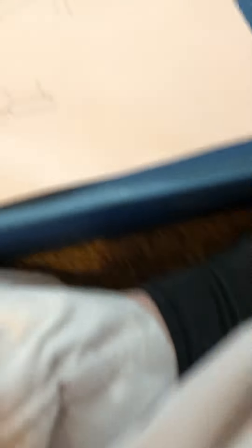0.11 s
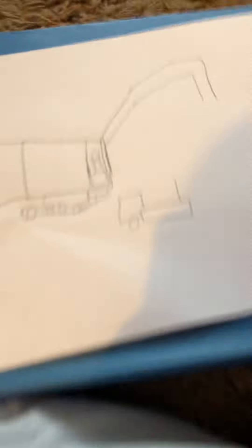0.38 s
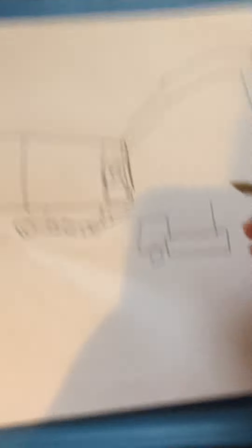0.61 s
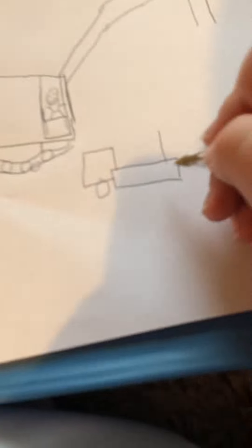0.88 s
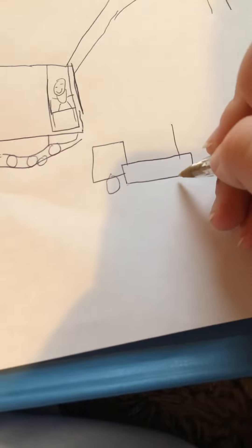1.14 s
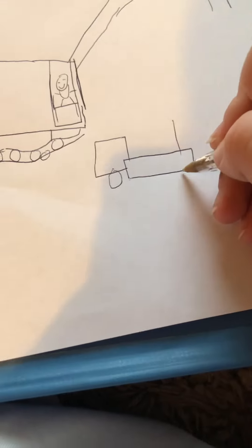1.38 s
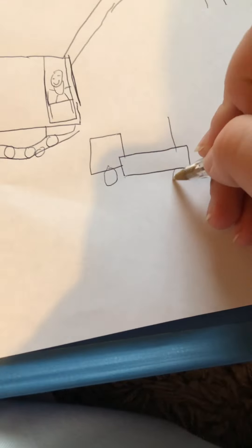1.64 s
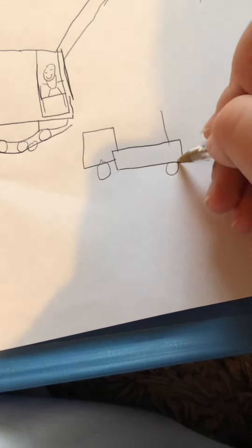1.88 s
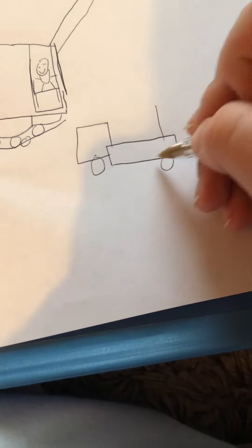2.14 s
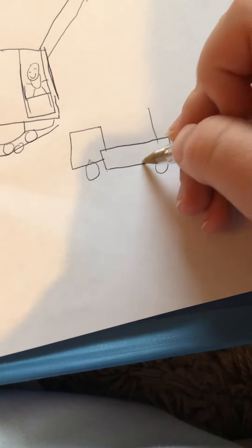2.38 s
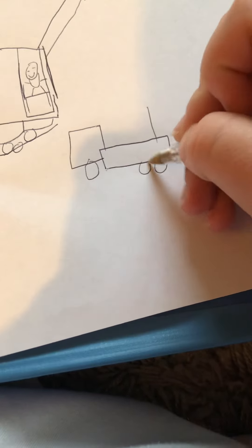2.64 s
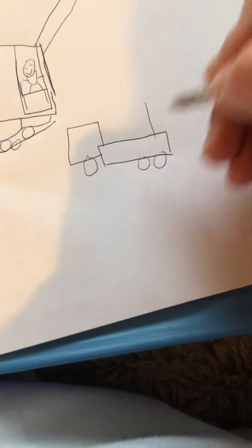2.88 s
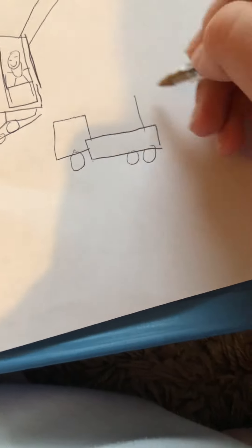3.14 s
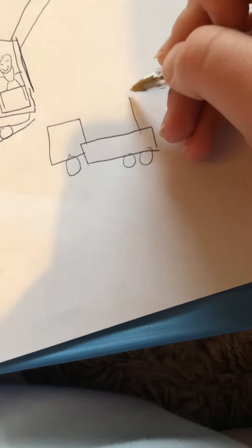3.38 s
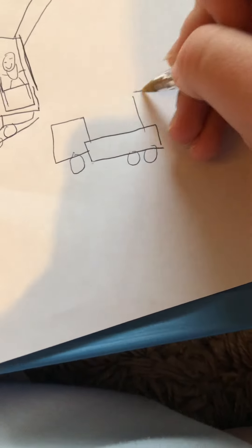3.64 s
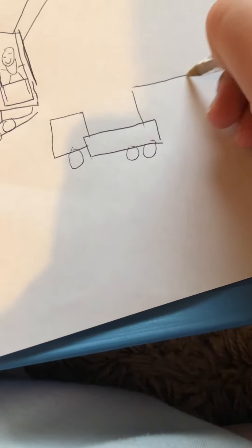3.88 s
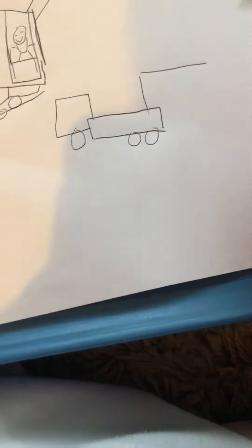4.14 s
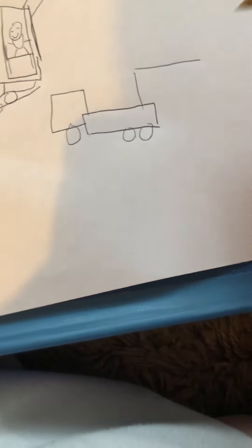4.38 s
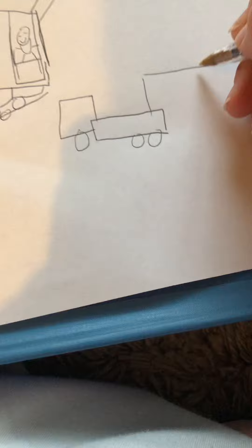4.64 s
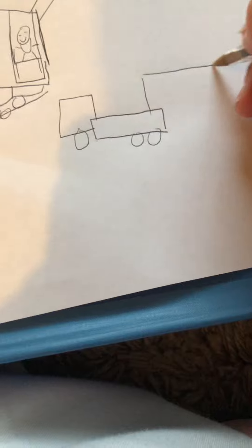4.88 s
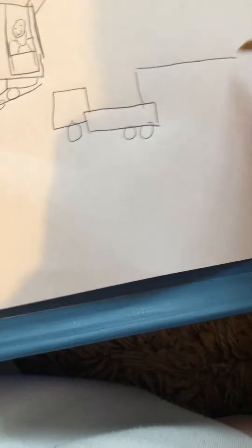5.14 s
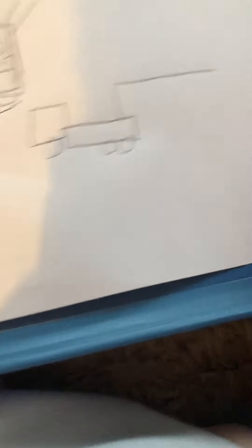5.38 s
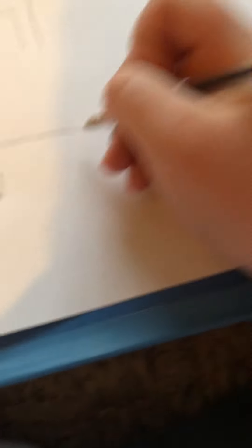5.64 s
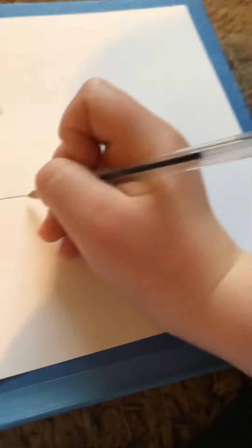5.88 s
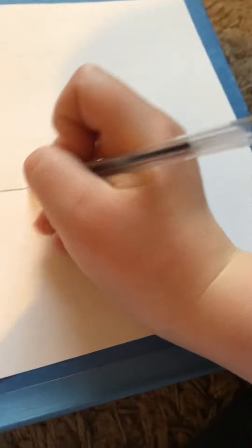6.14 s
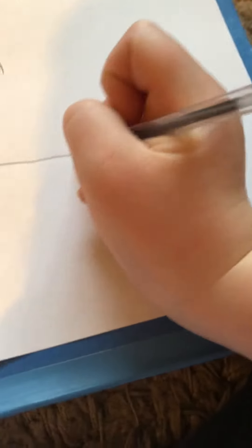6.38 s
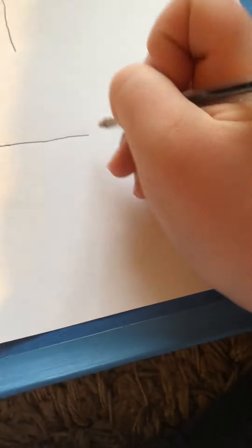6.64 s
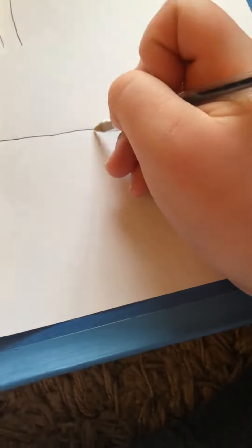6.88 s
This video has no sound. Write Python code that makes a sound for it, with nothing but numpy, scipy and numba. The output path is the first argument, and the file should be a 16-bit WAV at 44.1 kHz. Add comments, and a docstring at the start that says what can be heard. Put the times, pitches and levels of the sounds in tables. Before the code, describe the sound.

Very close to the microphone in a quiet carpeted room, cloth and paper rustle briefly, then a ballpoint pen draws short lines on a sheet resting on something hollow. Each landing gives a small woody tap, followed by a low drumming scrape with fine hiss. The hand brushes across the paper between strokes; another rustle comes before the last stroke.

```python
"""Ballpoint pen on a card box

A ballpoint pen draws short lines on a sheet lying on a hollow card box, in a quiet carpeted room, close by.
Rolling tip and landings force the damped modes of the lid; the box rocks and the pressed sheet crunches.
Tip hiss, hand skids and rustles are trains of friction grains shaped by spectra and resonances;
dry ticks are ringing noise bursts, over a steady bed of coloured noise."""
import sys
import numpy as np
from scipy import signal
from scipy.fft import rfft, irfft, next_fast_len
from scipy.io import wavfile
from scipy.ndimage import uniform_filter1d
from numba import njit

SR = 44100
rng = np.random.default_rng(int(sys.argv[2]) if len(sys.argv) > 2 else 0)


def wrap_up_sound(samples):
    """Save the sound to the file named by the first command line argument, as 16-bit audio."""
    columns = np.atleast_2d(samples).T
    # keep every value between -1 and 1, then stretch to whole-number steps
    tamed = np.clip(columns, -1, 1)
    steps = np.round(tamed * 32767).astype(np.int16)
    wavfile.write(sys.argv[1], SR, steps)


def voltage_ratio(level):
    """Linear amplitude factor for a level in decibels (scalar or array-like)."""
    return 10 ** (np.asarray(level, float) / 20)


N = 309141  # length of the scene in samples


# modes of the box lid: mode_hz, level_db, t60_s
LID_MODES = [(122, -16, 0.02), (152, -6, 0.019), (202.3, -0.5, 0.13), (233, -1, 0.16), (271.2, 5, 0.059),
             (321.2, 3, 0.039), (366.4, -4.5, 0.031), (411, -22, 0.14), (600, -39, 0.093),
             (632, -6.5, 0.0079), (726, -23, 0.037), (1000, -17, 0.012), (1380, -51, 0.0092),
             (1860, -33, 0.0065)]


def lid(force):
    """Modal superposition: the lid sums its damped modes; a small panel radiates little low sound."""
    out = sum(voltage_ratio(db) * ring(force, hz, t60_s) for hz, db, t60_s in LID_MODES)
    return signal.sosfilt(signal.butter(4, 140, "high", fs=SR, output="sos"), out)


# pressure of the rolling tip in each stroke, as lid rumble: time_s, level_db
PRESSURE = [
    [(1.58, -58), (1.6, -59.5), (1.648, -46), (1.674, -51.5), (1.838, -54.5), (1.886, -49), (1.95, -71)],
    [(2.45, -46.5), (2.47, -57.5), (2.526, -50), (2.552, -54.5), (2.694, -47.5), (2.788, -62), (2.8, -50)],
    [(3.15, -47), (3.182, -47), (3.194, -56.5), (3.27, -65)],
    [(3.62, -54.5), (3.684, -43), (3.758, -43.5), (3.886, -45.5), (3.9, -41), (3.984, -48.5), (4.04, -64)],
    [(4.83, -59), (4.842, -56), (4.882, -42.5), (4.954, -41.5), (5.062, -51.5), (5.106, -61.5), (5.12, -67)],
    [(6.125, -56), (6.163, -40), (6.227, -34.5), (6.259, -42), (6.35, -58.5)],
]
# the hand shifting its weight on the lid: peak_s, rumble_db, rise_s, fall_s
NUDGES = [(.185, -60, .1, 0.054), (.4, -61.5, 0.11, 0.12), (.73, -61, .04, 0.19), (.89, -61.5, 0.032, 0.21),
          (1.05, -61.5, 0.045, 0.071), (1.96, -65, 0.022, 0.33), (2.08, -69, 0.026, 0.037),
          (2.89, -63.5, 0.035, 0.039), (4.58, -54.5, 0.02, 0.056), (4.655, -56.5, 0.046, 0.029),
          (5.4, -67.5, 0.19, 0.18), (5.6, -59.5, 0.16, 0.16), (6.375, -62.5, 0.024, 0.19),
          (6.71, -54, 0.083, 0.044), (6.82, -63.5, 0.049, 0.12)]
WEIGHT_SHAPE = (1.66, 1.55)  # swell exponents (rise, fall): 1 pointed, 2 round, more = firm edge


def lid_rumble():
    """Forced vibration: tip and hand drag over paper grain, whose dense bumps drum the lid."""
    bumps = grains(per_s=5600, spread_db=2.86)
    # paper cushions the ball
    cushioned = signal.sosfilt(signal.butter(2, 420, fs=SR, output="sos"), bumps) + 4.44 * bumps
    rumble = rms_one(lid(cushioned))
    # steady pressure evens the swells
    swell = np.sqrt(uniform_filter1d(rumble ** 2, size=1300) + 0.24)
    evened = rumble / swell ** 0.5
    fall_longer = 2.52  # the weight stays on the lid this many times longer than the hiss
    skidding = [(s, lid_db, rise_s, fall_s * fall_longer) for s, _, rise_s, fall_s, lid_db in SKIDS]
    weight = swells(NUDGES + skidding, WEIGHT_SHAPE)
    return evened * (gains(PRESSURE, column=1) + weight)


# pen tip and knuckles landing on the lid: landing_s, peak_db, contact_ms, after_shocks_db
TAPS = [(0.872, -55.5, 0.87, -23), (1.51, -39.5, 1.08, -25), (1.631, -34, 7.4, -38),
        (1.864, -39.5, 1.1, -24), (2.068, -54, 5.5, -19), (2.413, -35, 1.3, -27), (2.83, -45, 0.66, -43),
        (3.131, -27.5, 1.05, -25), (3.163, -34, 3, -33), (3.564, -27.5, 0.7, -28.5),
        (3.899, -46, 0.45, -41), (4.066, -36.5, 1.1, -9), (4.53, -37, 0.55, -18), (4.778, -26, 1.07, -31),
        (5.158, -35.5, 3.5, -16), (6.083, -32.5, 1.16, -28.5), (6.362, -44.5, 1.4, -34),
        (6.45, -44.5, 5.1, -26.5), (6.69, -45, 0.64, -27)]


def taps():
    """Impact excitation: a shorter contact reaches higher modes; small after-shocks follow the push."""
    out, t = np.zeros(N), np.arange(SR // 5) / SR
    noises = rng.standard_normal((len(TAPS), SR // 5))
    for (s, peak_db, contact_ms, shocks_db), noise in zip(TAPS, noises):
        width = max(int(contact_ms * SR / 1000), 4)
        blows = voltage_ratio(shocks_db) * noise * np.exp(-t / 0.012)
        blows[0] = 1
        push = np.convolve(blows, np.hanning(width + 2))[:len(t)]
        thud = spread(lid(push), travel_ms=5.5)
        at = round((s - 0.002) * SR)  # starts 2 ms ahead of landing_s
        out[at:at + len(thud)] += (voltage_ratio(peak_db) * thud / np.abs(thud).max())[:N - at]
    return out


def rocking():
    """Low-frequency body motion: the box lurches after landings, sways under weight and never rests."""
    deep = signal.sosfilt(signal.butter(2, (50, 137), "band", fs=SR, output="sos"), rng.standard_normal(N))
    usual_tap_db, follows_tap = -36, 0.53  # share of a tap's excess over the usual that the lurch follows
    lag_s, rise_s, fall_s, under_tap_db = 0.0089, 0.039, 0.16, -24
    lurch_rows = []
    for s, tap_db, *_ in TAPS:
        lurch_db = usual_tap_db + follows_tap * (tap_db - usual_tap_db) + under_tap_db
        lurch_rows.append((s + lag_s, lurch_db, rise_s, fall_s))
    lurches = swells(lurch_rows, WEIGHT_SHAPE)
    under_tip = voltage_ratio(-27) * gains(PRESSURE, column=1)
    under_hand = voltage_ratio(-21.5) * swells(NUDGES, WEIGHT_SHAPE)
    restless = voltage_ratio(-76 + 3 * drift(1.0))
    return rms_one(deep) * (lurches + under_tip + under_hand + restless)


def crunch():
    """Granular crushing: each landing flattens the sheet in a short gritty burst that decays away."""
    under_tap_db, decay_s = -32, 0.0093
    band = signal.butter(1, (684, 5000), "band", fs=SR, output="sos")
    grit = signal.sosfilt(band, grains(per_s=3000, spread_db=4.0))
    hits = np.zeros(N)
    for s, tap_db, *_ in TAPS:
        hits[round(s * SR)] = voltage_ratio(tap_db + under_tap_db)
    return rms_one(grit) * signal.lfilter([1], [1, -np.exp(-1 / (decay_s * SR))], hits)


# pen strokes (levels at usual pressure): start_s, end_s, hiss_db, ring_hz, ring_db (relative to hiss_db)
STROKES = [(1.607, 1.873, -71.5, 5100, -10), (2.437, 2.753, -73, 4930, -17),
           (3.135, 3.274, -65.5, 4400, -17.5), (3.608, 3.986, -70, 4130, -11.5),
           (4.827, 5.064, -70.5, 4570, -7), (6.135, 6.31, -70.5, 5000, -7)]
# ball scraping, heard through pen and sheet: frequency_hz, level_db (per Hz)
BARREL = [(710, -30), (1200, 1), (1520, 1), (1910, -3), (2890, -9), (4170, -4), (5840, -9.5), (8170, -12.5),
          (10300, -11), (15200, -10.5), (16000, -29)]
# tip overtones: multiple (of ring_hz), width_hz, level_db
TIP = [(1, 480, 0), (1.42, 700, -7), (2.35, 1100, -5)]


def tip_hiss():
    """Rolling friction: fine scraping drives the tip's resonances, which differ with each grip."""
    scrape, t = grains(per_s=17000, spread_db=0.5), np.arange(N) / SR
    start, end, hiss_db, ring_hz, ring_db = np.transpose(STROKES)
    rise_s, fall_s = 0.015, 0.015  # time per 10 dB outside the stroke
    now = np.clip(np.searchsorted(start - 3 * rise_s, t) - 1, 0, None)  # stroke in force
    outside = np.maximum(start[now] - t, 0) / rise_s + np.maximum(t - end[now], 0) / fall_s
    usual_pressure_db, hiss_follows, ring_follows = -46, 0.6, 0.1  # shares of the pressure's swing heard
    swing_db = track(PRESSURE, column=1) - usual_pressure_db
    centre_hz = ring_hz[now] * (1 + 0.02 * drift(3.3))
    tip = sum(voltage_ratio(db) * resonance(scrape, multiple * centre_hz, width_hz) for multiple, width_hz, db in TIP)
    hiss = voltage_ratio(hiss_follows * swing_db) * coloured(scrape, BARREL)
    ringing = voltage_ratio(ring_db[now] + ring_follows * swing_db) * tip
    flicker_db = 2 * drift(13.4)
    return (hiss + ringing) * voltage_ratio(flicker_db + hiss_db[now] - 10 * outside)


# dry ticks of ball and sheet: start_s, peak_db, centre_hz, cycles (within one 60 dB decay)
TICKS = [(0.154, -47, 9500, 3.0), (.325, -49, 9000, 2), (.722, -51, 9000, 2.2), (0.8918, -54, 6000, 2.2),
         (1.4925, -51.5, 6760, 1.7), (1.5073, -52.5, 7000, 1.7), (2.393, -55, 6000, 0.83),
         (2.807, -53, 6000, 3), (2.823, -59, 6900, 2.6), (1.864, -59, 1500, 3.0), (3.1285, -47, 3500, 0.53),
         (3.898, -63, 900, 3.6), (5.159, -56, 1180, 4.7), (3.545, -47, 8860, 5.9), (3.5628, -53, 3180, 6.6),
         (3.5712, -66, 5950, 1.9), (4.0666, -52, 5000, 2.5), (4.531, -48, 2200, 1.7),
         (4.7705, -50, 10000, 2.6), (4.7766, -63, 3120, 2), (4.786, -66, 7000, 1.9),
         (4.9598, -45.5, 2750, 5.0), (4.96, -43, 8000, 2.5), (6.075, -46, 12900, 2.4),
         (6.082, -57, 4500, 1.3), (6.0917, -47, 3600, 6.4), (6.447, -60, 4970, 5.1),
         (6.786, -61.5, 1480, 25)]


def ticks():
    """Transient resonance: a tiny noise burst rings a few cycles through two equal modes in a row."""
    out, t = np.zeros(N), np.arange(800) / SR
    for (s, peak_db, hz, cycles), noise in zip(TICKS, rng.standard_normal((len(TICKS), 800))):
        burst = noise * np.exp(-t / 0.0005)
        t60_s = cycles / hz
        ringing = ring(ring(burst, hz, t60_s), hz, t60_s)
        tick = np.diff(ringing, prepend=0)
        at = round(s * SR)
        out[at:at + 800] += voltage_ratio(peak_db) * tick / np.abs(tick).max()
    return out


# skin skidding on paper: peak_s, hiss_db, rise_s, fall_s, lid_rumble_db
SKIDS = [(2.185, -71.5, 0.14, 0.046, -69), (2.23, -52.5, 0.049, 0.037, -63.5),
         (2.51, -62, 0.045, 0.022, -69), (2.843, -52, 0.032, .045, -57.5), (3.298, -53, 0.034, 0.031, -64),
         (4.103, -45.5, 0.035, 0.064, -49), (5.196, -52, 0.043, 0.037, -53),
         (6.49, -51.5, 0.031, 0.03, -53), (6.691, -62, 0.011, 0.014, -65), (6.761, -58, 0.027, 0.02, -60.5)]
# spectrum of the skid: frequency_hz, level_db (per Hz)
SKID_COLOUR = [(530, -5), (900, -0.5), (1250, -5), (1370, -4.5), (2190, -6.5), (2690, -7), (3380, -3),
               (3590, 1.5), (4360, 5), (5480, 1.5), (6720, 1.5), (7230, -2), (9770, 1.5), (14700, 0),
               (16000, -2)]
# resonances of the sheet under the skidding hand: centre_hz, width_hz, level_db
SHEET = [(3940, 40, -29), (4320, 1150, -19), (5850, 100, -20), (6590, 280, -17.5), (8400, 170, -27),
         (10000, 1400, -27.5)]


def skids():
    """Stick-slip friction: dense bright grains of skin on paper stutter and make the sheet sing faintly."""
    friction = grains(per_s=13000, spread_db=2.5)
    singing = sum(voltage_ratio(db) * resonance(friction, hz, width_hz) for hz, width_hz, db in SHEET)
    hiss = coloured(friction, SKID_COLOUR) + singing
    stutter = voltage_ratio(2.0 * drift(91))
    return rms_one(hiss) * stutter * swells([row[:4] for row in SKIDS], shape=(2.64, 2.35))


# cloth and sheet rustling as arm and hand move, one list per spell: time_s, level_db
RUSTLE = [
    [(0.0, -55), (0.03, -59.5), (0.33, -65), (0.354, -69.5), (0.392, -65), (0.616, -63.5), (0.742, -71.5),
     (0.77, -64), (0.8, -79.5), (0.85, -79), (0.894, -71), (0.934, -88), (1.066, -76.5), (1.12, -96)],
    [(5.25, -88.5), (5.372, -64), (5.424, -71.5), (5.516, -68), (5.542, -60), (5.56, -63.5), (5.594, -60.5),
     (5.648, -65), (5.826, -70), (5.916, -78), (5.94, -94), (5.99, -94)],
]
# spectrum of the rustle: frequency_hz, level_db (per Hz)
RUSTLE_COLOUR = [(290, 5.5), (500, 5.5), (688, 0.5), (1930, -1.5), (2460, -5.5), (8090, -6.5), (9490, -6.5),
                 (15100, -8.5), (16000, -13)]
# changing colour of the rustle: time_s, brightness_db, rasp_hz, rasp_db
RUSTLE_TONE = [(0, 0.9, 3220, -10), (.3, -0.8, 2750, -10.5), (.6, 2.3, 2230, -12.5), (.75, -0.5, 5700, -8),
               (1.05, 2, 5000, -9), (5.31, 5, 3830, -6.5), (5.4, -2, 3800, -10), (5.48, -2, 4300, -21),
               (5.6, 0.5, 5370, -3.5), (5.72, -0.5, 4860, -38), (5.95, 5, 4600, -25)]


def rustle():
    """Fibre friction: clumped grains split into dull and bright halves, with a rasp wandering in pitch."""
    fibres = grains(per_s=6000, spread_db=1.0) * voltage_ratio(0.99 * drift(35))
    hiss = coloured(fibres, RUSTLE_COLOUR)
    dull = signal.sosfilt(signal.butter(2, 3500, fs=SR, output="sos"), hiss)
    bright = hiss - dull
    tilt = voltage_ratio(track([RUSTLE_TONE], column=1))
    rasp_hz = track([RUSTLE_TONE], column=2)
    overtone = voltage_ratio(-7) * resonance(fibres, 1.72 * rasp_hz, width_hz=1100)
    rasp = resonance(fibres, rasp_hz, width_hz=1160) + overtone
    rasp_gain = voltage_ratio(track([RUSTLE_TONE], column=3))
    return (dull / tilt + bright * tilt + rasp_gain * rasp) * gains(RUSTLE, column=1)


# spectrum of the background: frequency_hz, level_db (per Hz)
ROOM_COLOUR = [(12, -12), (20, -42), (81, -6.5), (187, -6.5), (234, -2.5), (472, -7.5), (718, -12.5),
               (873, -13.5), (1400, -17.5), (2020, -19), (3840, -21.5), (14700, -26.5), (16000, -26.5)]


def room():
    """Stationary coloured noise: quiet room tone and microphone hiss, all but steady in level."""
    return voltage_ratio(-71 + 0.067 * drift(1.7)) * coloured(rng.standard_normal(N), ROOM_COLOUR)


def grains(per_s, spread_db):
    """Shot noise: random clicks of uneven size, as fibres catch and let go; rms 1."""
    sizes = voltage_ratio(spread_db * np.minimum(rng.exponential(1, N), 5)) * rng.choice([-1, 1], N)
    return rms_one(sizes * (rng.random(N) < per_s / SR)) + 1e-18


def ring(force, hz, t60_s):
    """Damped oscillator: a unit click sets one mode ringing as a sine of height 1."""
    r, w = voltage_ratio(-60 / (t60_s * SR)), 2 * np.pi * hz / SR
    return signal.lfilter([0, np.sin(w)], [1, -2 * r * np.cos(w), r * r], force + 1e-18)


def spread(x, travel_ms):
    """Dispersion: bending waves lag as 1 / root f (travel_ms at 200 Hz), so a blow is a falling chirp."""
    hz = np.arange(len(x) // 2 + 1) * SR / len(x)
    return irfft(rfft(x) * np.exp(-4j * np.pi * travel_ms / 1000 * np.sqrt(200 * hz)), len(x))


@njit
def sweep(x, r, cosine):
    """Two-pole resonance whose centre may move."""
    y = np.zeros(len(x))
    for i in range(2, len(x)):
        y[i] = x[i] - x[i - 2] + 2 * r * cosine[i] * y[i - 1] - r * r * y[i - 2]
    return y


def resonance(x, hz, width_hz):
    """Resonance, fixed or moving: the bandwidth sets the damping; rms 1."""
    return rms_one(sweep(x, np.exp(-np.pi * width_hz / SR), np.cos(2 * np.pi * hz / SR) * np.ones(N)))


def coloured(x, spectrum):
    """Linear filtering: shapes a wide-band signal by a spectrum of frequency_hz, level_db; rms 1."""
    size = next_fast_len(N)
    hz = np.maximum(np.arange(size // 2 + 1) * SR / size, 1)
    table_hz, table_db = np.transpose(spectrum)
    db = np.interp(np.log(hz), np.log(table_hz), table_db)
    return rms_one(irfft(rfft(x, size) * voltage_ratio(db), size)[:N])


def swells(rows, shape):
    """Envelope: gain of swells given as peak_s, level_db, rise_s, fall_s, by exponents (rise, fall)."""
    out, t = np.zeros(N), np.arange(N) / SR
    drop_db = 39  # fall from the peak at rise_s before it and fall_s after it
    for s, db, rise_s, fall_s in rows:
        near = slice(max(int((s - 3 * rise_s) * SR), 0), int((s + 3 * fall_s) * SR))
        dt = t[near] - s
        before, after = np.abs(dt / rise_s) ** shape[0], np.abs(dt / fall_s) ** shape[1]
        out[near] += voltage_ratio(db - drop_db * np.where(dt < 0, before, after))
    return out


def gains(tables, column, fade_s=0.078):
    """Envelope: gain from several level tables, faded across their ends and silent between them."""
    out, t = np.zeros(N), np.arange(N) / SR
    for rows in tables:
        s, db = np.array(rows)[:, 0], np.array(rows)[:, column]
        edge = np.clip(np.minimum(t - s[0], s[-1] - t) / fade_s + 0.5, 0, 1)
        out += edge * voltage_ratio(np.interp(t, s, db))
    return out


def track(tables, column):
    """Linear interpolation: a control read off all rows of the tables, joined across the gaps."""
    rows = np.concatenate(tables)
    return np.interp(np.arange(N) / SR, rows[:, 0], rows[:, column])


def drift(rate_hz):
    """Low-passed noise: slow chance of spread 1, made at a sixteenth of the sample rate."""
    r = np.exp(-32 * np.pi * rate_hz / SR)
    noise = rng.standard_normal(N // 16 + 4002)
    slow = signal.lfilter([1], [1, -2 * r, r * r], noise)[4000:]  # skips the settling
    return np.interp(np.arange(N) / 16, np.arange(len(slow)), rms_one(slow))


def rms_one(x):
    """Normalisation: scales to unit rms."""
    return x / np.sqrt(np.mean(x ** 2) + 1e-20)


def scene():
    """Superposition: all sources add at one microphone."""
    box = lid_rumble() + taps() + rocking()
    paper = crunch() + tip_hiss() + ticks() + skids() + rustle()
    return (box + paper + room())[None]


def roll_off(x):
    """The treble ends steeply here."""
    return signal.sosfilt(signal.butter(12, 15900, fs=SR, output="sos"), x)


def record(dry):
    """High-pass response: the microphone drops the deepest bass."""
    thinner = signal.sosfilt(signal.butter(4, 42, "high", fs=SR, output="sos"), dry)
    return roll_off(thinner)


dry = scene()
out = record(dry)
wrap_up_sound(out)
```